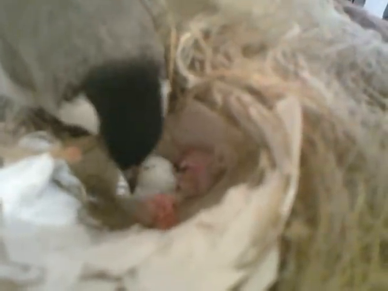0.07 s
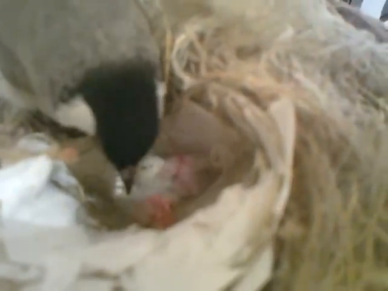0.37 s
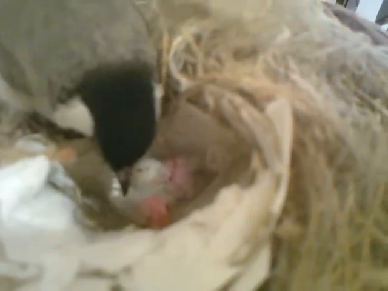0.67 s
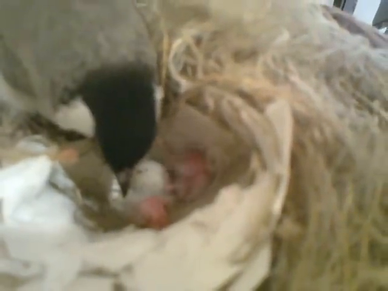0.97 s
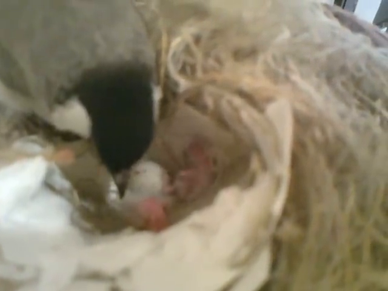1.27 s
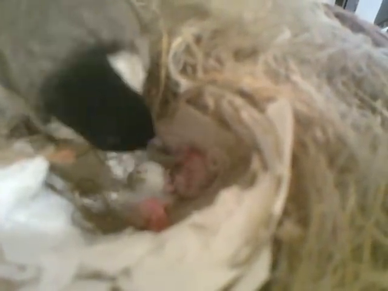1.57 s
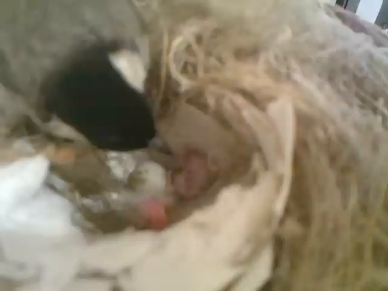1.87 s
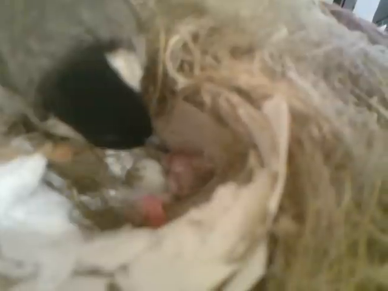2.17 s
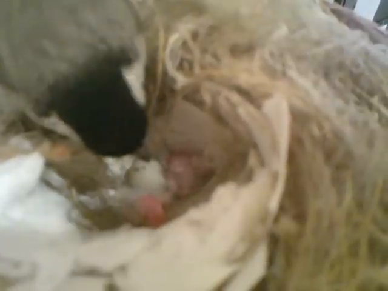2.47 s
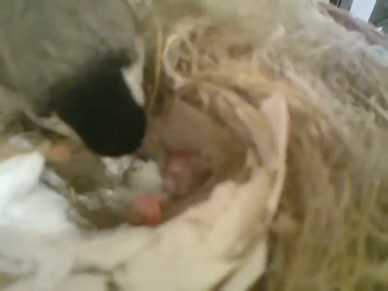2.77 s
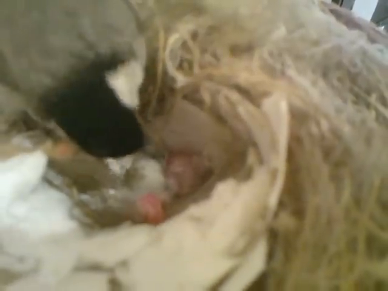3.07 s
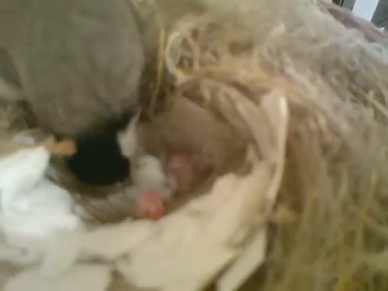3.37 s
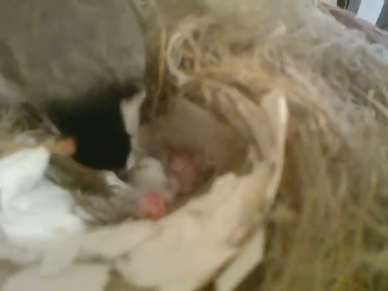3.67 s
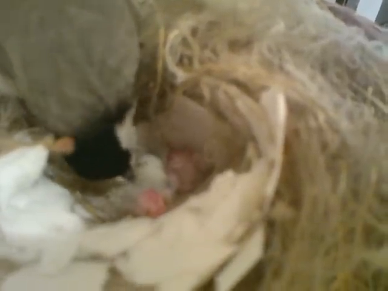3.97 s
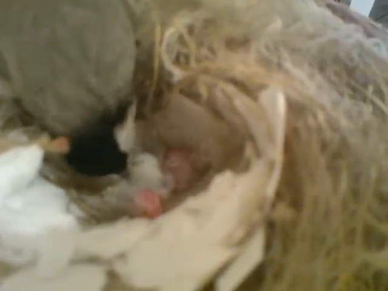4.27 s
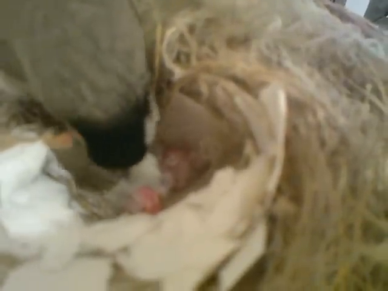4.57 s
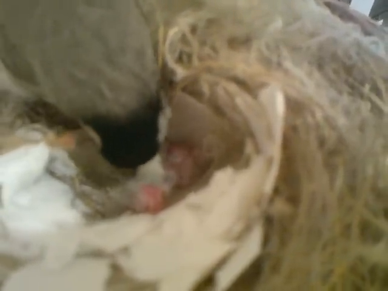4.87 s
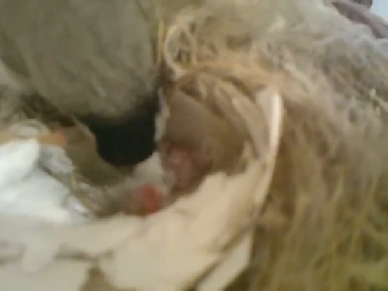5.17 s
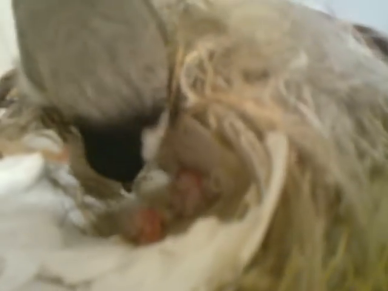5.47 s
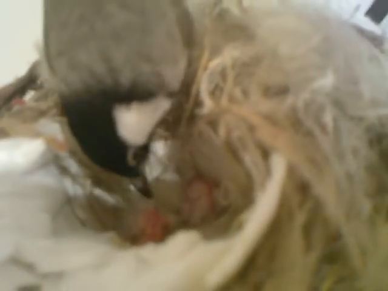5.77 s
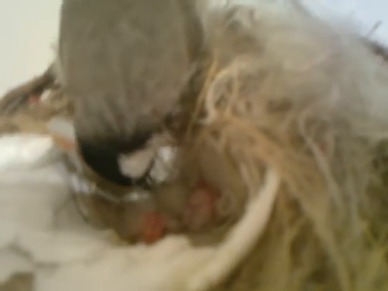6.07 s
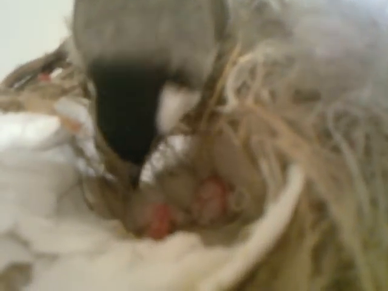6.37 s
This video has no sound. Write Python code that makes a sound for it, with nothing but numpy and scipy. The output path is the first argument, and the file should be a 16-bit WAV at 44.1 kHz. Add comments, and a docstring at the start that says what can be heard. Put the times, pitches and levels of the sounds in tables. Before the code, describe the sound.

A small bird chirps close by, beside a nest of hatchlings in a hard-walled room. Its notes are high and very brief, each drawn out by about half a second of room echo. The first burst comes right at the start and is mostly raspy. At about 1 second, three cleaner notes climb in pitch. A harsher, buzzing group follows from 2.3 to 2.6 seconds. From 3.2 to 3.6 seconds, three rising notes end in a rasp. The last burst, from 5.1 to 5.3 seconds, is another three clean rising notes, the top one brightest. One soft, dull knock sounds at the nest just before 6 seconds. Barely audible rustles occur around 0.7, 2 and 6.3 seconds. Underneath runs quiet room tone with a faint electrical hum and a low rumble that swells slightly just before 1 second and around 3.3 seconds.

```python
"""A small bird chirps in five short bursts in a hard-walled room, close to a nest of hatchlings.
Each note is a brief pitch arch from the syrinx, filtered by the throat and drawn out by the room.
Clean notes climb in steps of three; harsh ones rasp as the membranes lose tension.
Underneath: a few faint rustles, one soft knock, mains hum, low rumble and room tone."""
import sys
import numpy as np
from scipy import signal
from scipy.fft import rfft, irfft
from scipy.io import wavfile
from scipy.ndimage import uniform_filter1d

SR = 44100
rng = np.random.default_rng(int(sys.argv[2]) if len(sys.argv) > 2 else 0)


def unload_audio(sound):
    """Save the sound as a 16-bit wav file, at the path given as the first command line argument."""
    columns = np.transpose(np.atleast_2d(sound))
    # keep every value between -1 and 1, then stretch to whole-number steps
    steps = np.round(np.clip(columns, -1, 1) * 32767)
    wavfile.write(sys.argv[1], SR, steps.astype(np.int16))


N = 291942

# Note kinds. Each entry: rise as a share of the length, start and end pitch as shares of the top,
# rasp as the deepest sag over pitch, turbulence re tone in dB, lower throat edge in Hz.
NOTE_KINDS = { "low": dict(rise=.28, start=0.66, end=.73, rasp=.015, air_db=-13.5, edge_hz=1810),
              "middle": dict(rise=.6, start=.78, end=.9, rasp=.014, air_db=-34.5, edge_hz=2480),
              "high": dict(rise=.68, start=.82, end=.88, rasp=.042, air_db=-20.5, edge_hz=2500),
              "harsh": dict(rise=.52, start=.64, end=.64, rasp=.13, air_db=-20, edge_hz=2430),
              "buzz": dict(rise=.42, start=.88, end=.87, rasp=.075, air_db=-10.5, edge_hz=2970), }
# Each row: start in seconds, length in seconds, top pitch in Hz, source level in dB,
# slope per harmonic in dB, kind.
BIRD_NOTES = [ (-.012, .042, 3940, -38.5, -12, "harsh"), (-.005, 0.029, 1698, -41.5, -10, "buzz"),
              (0.104, 0.015, 3424, -35, -23, "middle"), (.116, .057, 4127, -40, -23, "harsh"),
              (.981, 0.035, 2485, -48, -2, "low"), (1.123, 0.024, 3245, -38, -15.5, "middle"),
              (1.209, 0.032, 4070, -38.5, -24, "high"), (2.285, 0.045, 2107, -40.5, -4.5, "buzz"),
              (2.403, 0.045, 4222, -36, -10, "harsh"), (2.541, .04, 4200, -37, -13.5, "harsh"),
              (2.550, 0.019, 1703, -42.5, -11.5, "buzz"), (3.188, .047, 2331, -48, -6, "low"),
              (3.332, .035, 3206, -39.5, -13, "middle"), (3.426, 0.034, 3988, -38.5, -5, "high"),
              (3.547, 0.061, 4100, -41, -10.5, "harsh"), (3.570, 0.0354, 1775, -47.5, -5, "buzz"),
              (5.066, 0.048, 2547, -51, -6, "low"), (5.187, 0.028, 3204, -35.5, -17, "middle"),
              (5.300, 0.017, 4124, -32.5, -13, "high"), ]
# Throat and beak resonance. Each row: frequency in Hz, gain in dB.
THROAT_RESPONSE = [(4200, -1.5), (4500, -8.5), (5000, -8), (6300, -15.5), (7000, -21.5), (8100, -25),
                   (10000, -49.5)]
# Throat turbulence. Each row: frequency in Hz, relative level in dB.
TURBULENCE_SPECTRUM = [(900, -52), (1500, -16.5), (2000, -7), (2800, 4), (4100, -2.5), (4500, -8.5),
                       (5200, -8.5), (7500, -30.5), (9000, -37.5)]
# Wall and furniture echoes. Each row: delay in seconds, level re direct sound in dB.
WALL_ECHOES = [(.0047, -7.5), (0.0127, -4), (0.0193, -19.5), (0.0275, -6.5)]
# Each row: start in seconds, length in seconds, centre in Hz, level in dB.
NEST_RUSTLES = [(0.737, 0.021, 2550, -69.5), (2.013, 0.18, 3380, -72), (6.304, .19, 4160, -73.5)]
# Each row: frequency in Hz, 60 dB decay time in seconds, relative level in dB.
NEST_KNOCK_MODES = [(335, 0.024, 4.5), (466, 0.017, -5), (678, 0.049, -12)]
# Each row: frequency in Hz, level in dB.
HUM_LINES = [(48, -71.5), (96, -64), (199.5, -72), (286, -80.5), (587, -88), (942, -99)]
# Each row: frequency in Hz, relative level in dB.
RUMBLE_SPECTRUM = [(12, -25), (42, -0.5), (90, 1.5), (125, -10), (160, -5), (210, -29.5), (900, -75)]
# Each row: midpoint in seconds, length in seconds, peak added gain in dB.
RUMBLE_SWELLS = [(0.63, 0.24, -63), (0.906, 0.31, -60), (3.286, 0.71, -54)]
# Each row: frequency in Hz, relative level in dB.
ROOM_TONE_SPECTRUM = [(15, -19.5), (33, -4.5), (62, -4), (80, -5.5), (100, -6.5), (130, -15), (220, -15),
                      (330, -21), (450, -26.5), (700, -31), (1100, -33), (3500, -36), (10000, -40),
                      (15500, -38)]


def chirp(length_s, top_hz, slope_db, rise, start, end, rasp, air_db, edge_hz, rasp_hz=700):
    """The syrinx tightens and slackens, sweeping four harmonics through the throat resonance."""
    size = int(length_s * SR)
    arch = np.interp(np.linspace(0, 1, size), [0, rise, 1], [-1, 0, 1])
    slack = (1 - np.where(arch < 0, start, end)) * arch ** 2
    sag = rasp * (1 + np.tanh(wander(rasp_hz, size))) / 2  # membranes lose tension in jerks
    pitch_hz = top_hz * (1 - slack) * (1 - sag)
    phase = 2 * np.pi * np.cumsum(pitch_hz) / SR
    envelope = np.abs(np.cos(np.pi * arch / 2)) ** 0.41
    tone = 0
    for k in range(1, 5):
        low_cut = 1 / np.hypot(1, (edge_hz / (k * pitch_hz)) ** 10)  # narrowed throat
        throat = colour(THROAT_RESPONSE, k * pitch_hz) * low_cut
        bloom = envelope ** (0.86 * (k - 1))  # overtones grow where pushed hardest
        tone = tone + throat * undb(slope_db * k) * bloom * np.sin(k * phase)
    air = undb(air_db) * noise(TURBULENCE_SPECTRUM, size)
    return unit(envelope * (unit(tone) + air))


def bird(lead_s=0.1):
    """All chirps, ringing in the room. The lead admits notes that start before zero."""
    lead = int(lead_s * SR)
    out = np.zeros(N + lead)
    for start_s, length_s, top_hz, level_db, slope_db, kind in BIRD_NOTES:
        note = chirp(length_s, top_hz, slope_db, **NOTE_KINDS[kind])
        add(out, undb(level_db) * note, start_s + lead_s)
    return room(out)[lead:]


def room(x, t60_s=0.54, tail_db=5.0, build_s=0.044):
    """Direct sound, hard echoes, then a dense tail carrying most of the energy."""
    t = np.arange(SR) / SR
    tail = rng.standard_normal(SR) * undb(-60 * t / t60_s) * (1 - np.exp(-t / build_s))
    response = undb(tail_db) * tail / np.linalg.norm(tail)
    response[0] += 1
    for delay_s, db in WALL_ECHOES:
        response[int(delay_s * SR)] += undb(db)
    return signal.fftconvolve(x, response / np.linalg.norm(response))[:len(x)]


def rustles():
    """Faint nest rustles: smooth bursts of band noise."""
    out = np.zeros(N)
    for start_s, length_s, hz, db in NEST_RUSTLES:
        size = int(length_s * SR)
        add(out, undb(db) * np.hanning(size) * band(0.75 * hz, 1.18 * hz, size), start_s)
    return out


def knock(start_s=5.9482, gain_db=-40.5, contact_s=0.0013):
    """One soft contact at the nest rings three quickly damped modes."""
    out = np.zeros(N)
    t = np.arange(SR // 10) / SR
    ring = sum(undb(db - 60 * t / t60_s) * np.sin(2 * np.pi * hz * t)
               for hz, t60_s, db in NEST_KNOCK_MODES)
    attack = 1 - np.exp(-(t / contact_s) ** 2)
    add(out, undb(gain_db) * ring * attack, start_s)
    return out


def mains_hum(waver_hz=1.6, waver_rate_hz=12):
    """Appliance hum; each line wavers in pitch on its own."""
    out = np.zeros(N)
    for hz, db in HUM_LINES:
        pitch_hz = hz + waver_hz * wander(waver_rate_hz, N)
        out += undb(db) * unit(np.sin(2 * np.pi * np.cumsum(pitch_hz) / SR))
    return out


def rumble(steady_db=-71):
    """Low room noise that swells three times."""
    gain = np.full(N, undb(steady_db))
    for middle_s, length_s, db in RUMBLE_SWELLS:
        add(gain, undb(db) * np.hanning(int(length_s * SR)), middle_s - length_s / 2)
    return gain * noise(RUMBLE_SPECTRUM, N)


def room_tone(level_db=-62):
    """Steady broadband noise, weighted to the bass."""
    return undb(level_db) * noise(ROOM_TONE_SPECTRUM, N)


def undb(db):
    """Decibels to gain."""
    return 10 ** (np.asarray(db) / 20)


def unit(x):
    """Scale to rms 1."""
    return x / np.sqrt(np.mean(x ** 2))


def colour(points, hz):
    """Gain at hz of a spectrum of (Hz, dB) points."""
    knots_hz, db = np.transpose(points)
    return undb(np.interp(np.log(np.maximum(hz, 1)), np.log(knots_hz), db))


def noise(points, size):
    """Coloured noise, rms 1."""
    white = rfft(rng.standard_normal(size))
    return unit(irfft(white * colour(points, np.fft.rfftfreq(size, 1 / SR)), size))


def band(lo_hz, hi_hz, size):
    """Soft-edged band noise, rms 1."""
    sos = signal.butter(2, [lo_hz, hi_hz], "band", fs=SR, output="sos")
    return unit(signal.sosfilt(sos, rng.standard_normal(size)))


def wander(rate_hz, size):
    """Random drift, rms 1."""
    position = np.arange(size) / SR * rate_hz
    knots = int(position[-1]) + 2
    return unit(np.interp(position, np.arange(knots), rng.standard_normal(knots)))


def add(out, x, start_s):
    """Mix x into out."""
    i = max(int(start_s * SR), 0)
    out[i:i + len(x)] += x[:len(out) - i]


def scene():
    """Bird, nest and room at one microphone."""
    return (bird() + rustles() + knock() + mains_hum() + rumble() + room_tone())[None]


def record(dry, open_db=8, threshold_db=-53, split_hz=1200, fizz_db=-62, overload_db=-30, top_hz=15750):
    """A hiss suppressor lifts the treble only while loud; faint fizz rides the peaks; the top is cut."""
    treble = signal.sosfiltfilt(signal.butter(2, split_hz, "high", fs=SR, output="sos"), dry)
    power = np.abs(uniform_filter1d(treble ** 2, SR // 50))  # 20 ms mean
    opening = power / (power + undb(threshold_db) ** 2)
    overload = np.abs(treble / undb(overload_db)) ** 3
    fizz = undb(fizz_db) * overload * rng.standard_normal(dry.shape)
    out = dry + (undb(open_db) - 1) * opening * treble + fizz
    return signal.sosfilt(signal.ellip(10, .1, 70, top_hz, fs=SR, output="sos"), out)


dry = scene()
out = record(dry)
unload_audio(out)
```